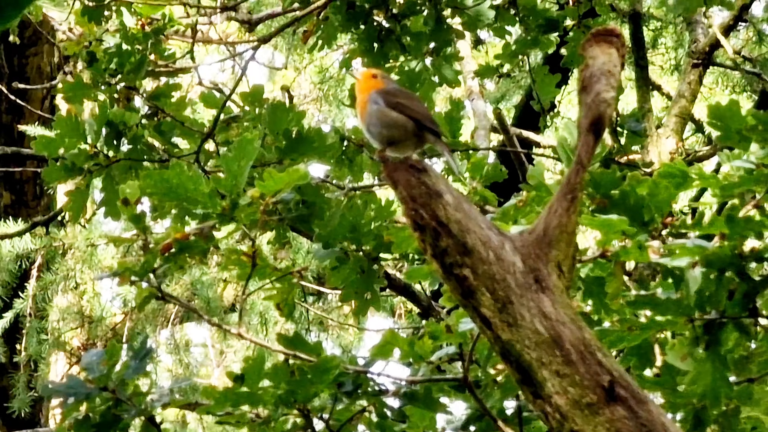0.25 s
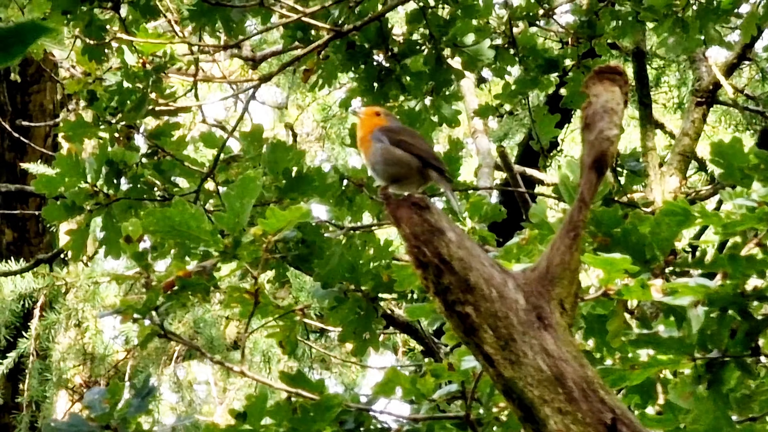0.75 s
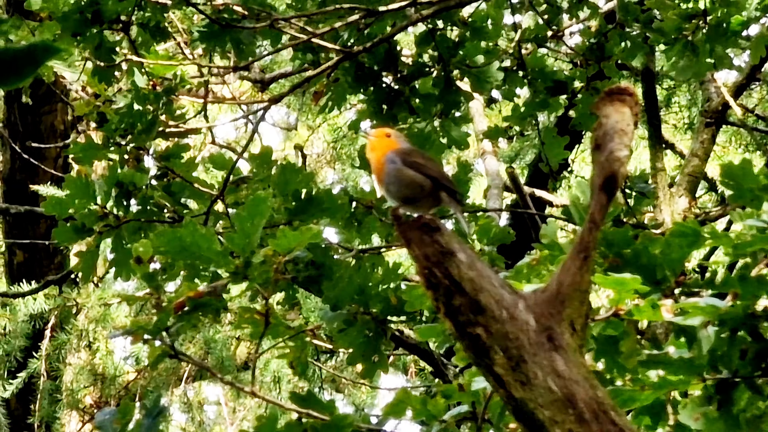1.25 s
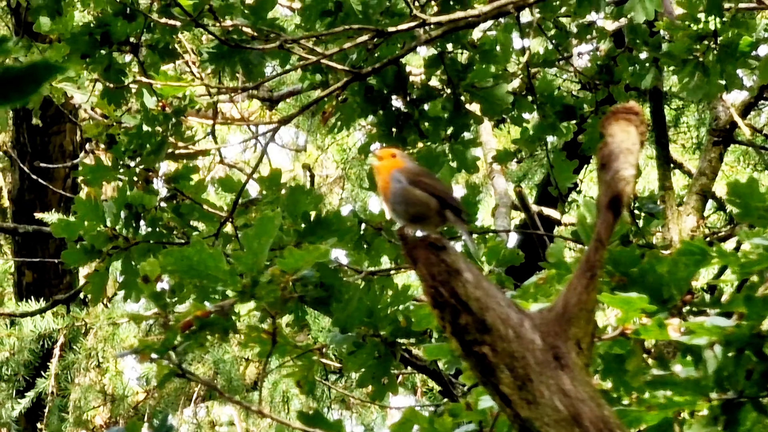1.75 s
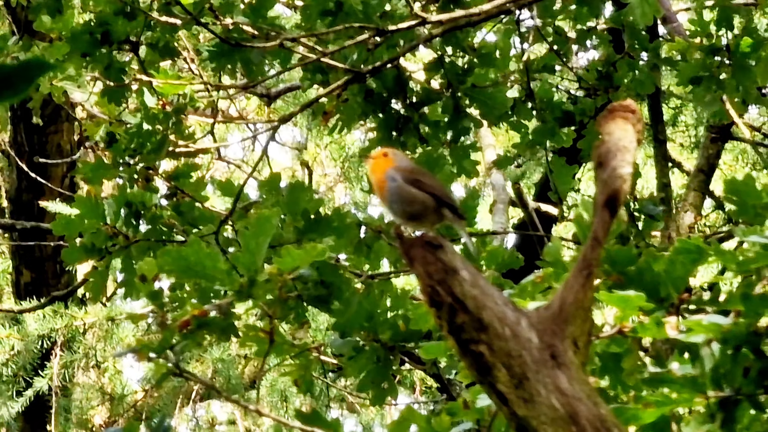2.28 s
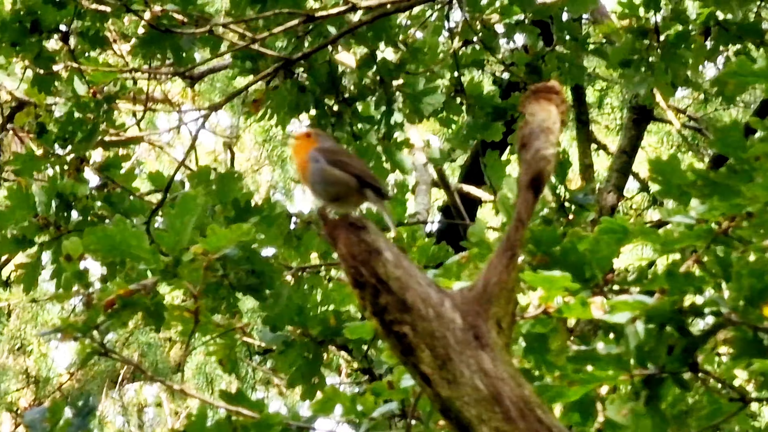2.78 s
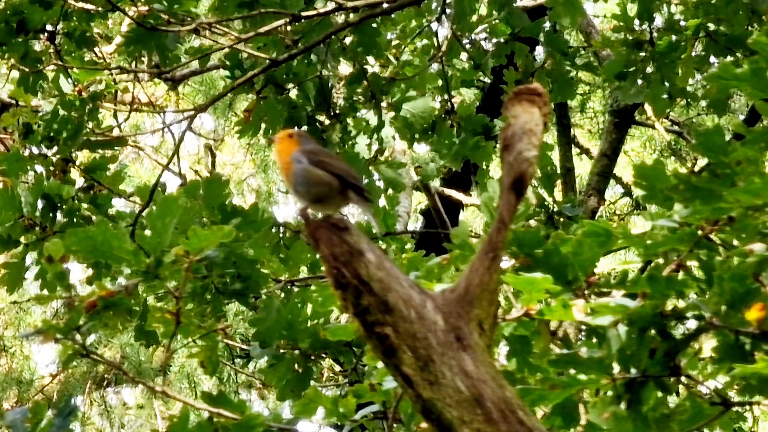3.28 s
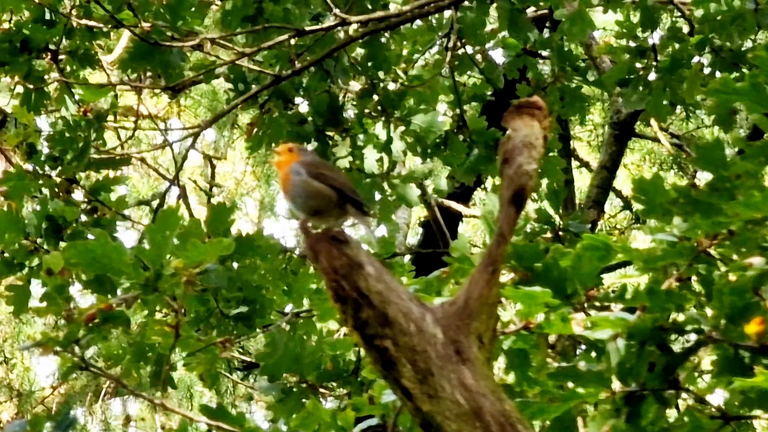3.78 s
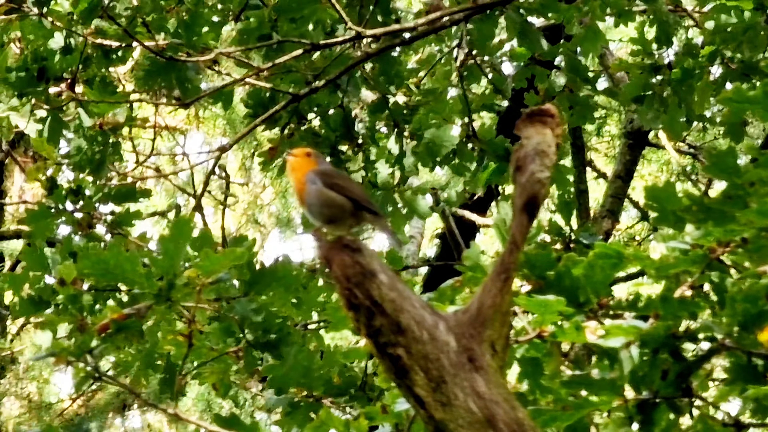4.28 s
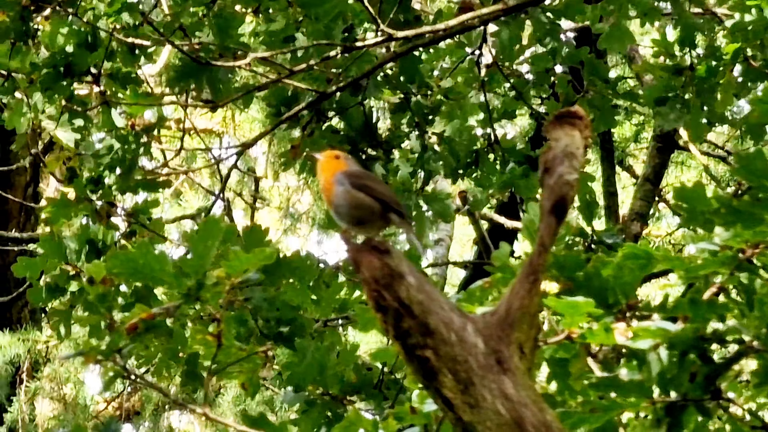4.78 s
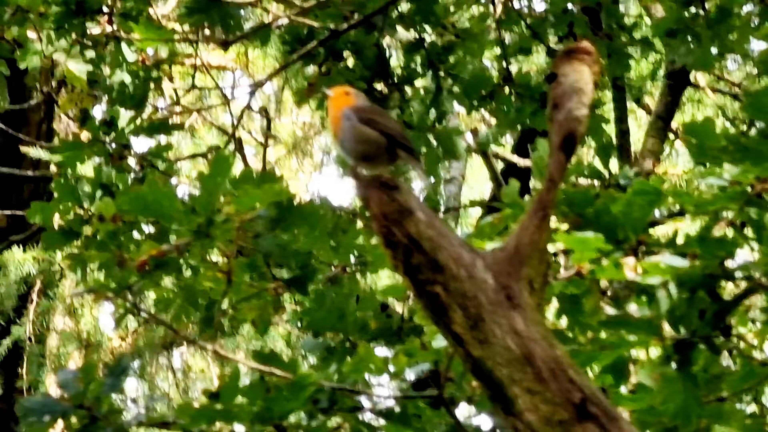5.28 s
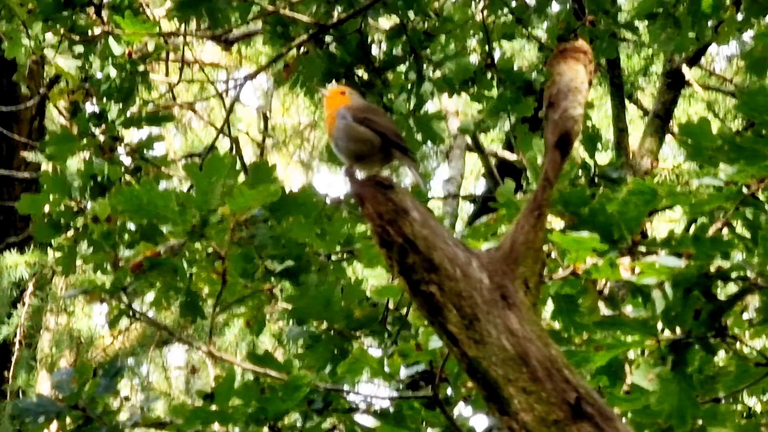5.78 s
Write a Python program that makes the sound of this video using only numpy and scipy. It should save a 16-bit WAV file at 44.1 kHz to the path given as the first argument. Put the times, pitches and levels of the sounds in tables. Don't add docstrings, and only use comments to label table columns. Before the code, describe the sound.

Bright, liquid bird warbles, shrill falls and a fast rattle echo softly among trees, with faint far birds and deep distant rumble beneath.

```python
import sys
import numpy as np
from scipy import signal
from scipy.fft import rfft, irfft, next_fast_len
from scipy.io import wavfile
from scipy.ndimage import uniform_filter1d

SR = 44100
rng = np.random.default_rng(int(sys.argv[2]) if len(sys.argv) > 2 else 0)


def output_pcm(signal):
    pcm = np.clip(np.atleast_2d(signal).T, -1, 1) * 32767
    wavfile.write(sys.argv[1], SR, np.round(pcm).astype(np.int16))


def magnitude_from_level(level_db):
    exponent = np.asarray(level_db, float) / 20
    return 10 ** exponent


N = 266364
EDGE_HZ = 15830


def evened(x):
    return x / np.sqrt(np.mean(x ** 2) + 1e-20)


def read(points, hz):
    f, value = np.transpose(points)
    return np.interp(np.log(hz + 1), np.log(f + 1), value)


def add(mix, s, sound):
    part = mix[..., round(s * SR):][..., :sound.shape[-1]]
    part += sound[..., :part.shape[-1]]


def wander(count, smooth_s):
    size = max(round(smooth_s * SR), 1)
    once = uniform_filter1d(rng.standard_normal(count), size)
    return evened(uniform_filter1d(once, size))


def unroll(rows, fade_s):
    s, *columns = np.transpose(rows)
    t = np.arange(s[0], s[-1], 1 / SR)
    to_end = np.minimum(t - s[0], s[-1] - t)
    fade = np.sin(np.pi / 2 * np.clip(to_end / fade_s, 0, 1))
    return s[0], fade, [np.interp(t, s, c) for c in columns]


def shaped(table, attack, release, start_db, end_db, hurry=1.01, dip_hz=0.1):
    u = np.linspace(0, 1, 80)
    swell_db = start_db * np.clip(1 - u / attack, 0, 1) + end_db * np.clip(1 - (1 - u) / release, 0, 1)
    glide = 1 - (1 - u) ** hurry
    dip = dip_hz * np.sin(np.pi * u)
    return [np.c_[s + length * u, first + (last - first) * glide - dip, db + swell_db]
            for s, length, first, last, db in table]


def sung(tables, voice):
    line = np.zeros(N)
    for rows in tables:
        add(line, *voice(rows))
    return line


# (time [s], factor on waver and flutter [1])
VOICE_STRAIN = [(0, 0.98), (1.7, 0.87), (2.0, 0.91), (2.24, 1.36), (2.27, 0.55), (2.4, 1.2), (2.89, .5),
                (2.93, 1.3), (2.989, 1), (3.03, 0.43), (3.581, 1.2), (3.8, 2), (4.031, 3.5), (4.06, 1.1),
                (4.17, 0.71), (4.211, 1.2), (4.3, 1.2), (4.5, 1.2), (4.62, 1.2), (4.71, 0.14), (6.04, .6)]
# (frequency [Hz], level under the note [dB])
OVERTONE_COLOUR = [(5000, -36), (7000, -34.5), (8500, -47.5), (9500, -39), (11000, -32), (13200, -38.5),
                   (14200, -28.5), (16000, -28.5)]
OVERTONE_TRIM = [2, -13.5, -19, -6]


def whistle(rows, waver_hz=20, flutter_db=1.4, blur=1, clear=.7):
    s, fade, (hz, db) = unroll(rows, fade_s=.0025)
    count = len(hz)
    strain = blur * np.interp(s + np.arange(count) / SR, *np.transpose(VOICE_STRAIN))
    hz = uniform_filter1d(hz, 90) + strain * waver_hz * wander(count, smooth_s=0.0018)
    turn = 2 * np.pi * np.cumsum(hz) / SR
    k = np.arange(2, 6)[:, None]
    overtone_level = magnitude_from_level(read(OVERTONE_COLOUR, k * hz) + np.c_[OVERTONE_TRIM])
    overtones = overtone_level * np.sin(k * turn) * (k * hz < EDGE_HZ)
    overtones = overtones * (clear + (1 - clear) * wander(count, smooth_s=.0008))
    level = magnitude_from_level(db + strain * flutter_db * wander(count, smooth_s=0.0023))
    return s, np.sqrt(2) * fade * level * (np.sin(turn) + overtones.sum(0))


def coupled(x, mix_db=-20, rasp_db=-40, rasp_hz=(11100, 12500), shrill_hz=5200):
    power = abs(signal.hilbert(x, next_fast_len(N))[:N]) ** 2
    slow = uniform_filter1d(power, 300) + 1e-9
    pull = magnitude_from_level(mix_db) * np.interp(np.arange(N) / SR, *np.transpose(VOICE_STRAIN)) ** 2
    rasp_band = signal.butter(2, rasp_hz, "band", fs=SR, output="sos")
    rasp = signal.sosfilt(rasp_band, rng.standard_normal(N))
    shrill = signal.sosfilt(signal.butter(4, shrill_hz, "high", fs=SR, output="sos"), x)
    blow = np.sqrt(abs(uniform_filter1d(shrill ** 2, 600)))
    return x * (1 + pull * (np.tanh(power / slow - 1))) + magnitude_from_level(rasp_db) * blow * evened(rasp)


# (time [s], pitch [Hz], level [dB])
STAIRCASE_FALLS = [
    [(1.826, 8500, -36), (1.837, 6690, -30), (1.852, 7170, -26.5), (1.86, 6800, -27.5), (1.879, 6880, -24),
     (1.897, 5185, -19.5), (1.914, 4612, -22), (1.932, 4753, -16.5), (1.943, 5130, -27.5)],
    [(2.125, 7750, -36.5), (2.14, 7500, -35), (2.158, 7440, -23), (2.174, 6366, -20.5), (2.189, 5490, -26),
     (2.207, 5990, -23), (2.235, 5610, -16.5)],
    [(2.232, 5710, -16), (2.245, 4344, -32), (2.256, 4633, -26), (2.271, 4727, -14.5), (2.284, 4610, -23.5),
     (2.299, 2460, -39)],
    [(2.393, 5510, -27.5), (2.401, 4060, -23.5), (2.41, 4235, -27.5), (2.419, 3120, -33.5),
     (2.44, 2780, -42.5), (2.466, 2800, -44.5)],
    [(2.876, 3976, -29.5), (2.888, 4128, -24), (2.922, 4480, -24.5), (2.937, 5234, -20.5),
     (2.95, 5430, -25), (2.966, 5314, -21.5), (2.976, 5080, -22.5), (2.989, 4044, -25),
     (3.002, 3280, -29.5)],
]
# (time [s], pitch [Hz], level [dB])
BENT_NOTES = [
    [(1.455, 3530, -56.5), (1.472, 3560, -45), (1.488, 3600, -51), (1.512, 3584, -45), (1.545, 3557, -50),
     (1.563, 3520, -47.5), (1.576, 3440, -53), (1.6, 3450, -55)],
    [(1.437, 4090, -54), (1.46, 3800, -54), (1.5, 3780, -53), (1.512, 3860, -47), (1.525, 3830, -48.5),
     (1.54, 3870, -44.5), (1.556, 3750, -52), (1.582, 3735, -48.5), (1.592, 3700, -56)],
    [(1.089, 3480, -37.5), (1.095, 3880, -28.5), (1.11, 4220, -29.5), (1.122, 3763, -36),
     (1.151, 3700, -33.5), (1.162, 3810, -49)],
    [(1.757, 6080, -44), (1.764, 7460, -51), (1.769, 6390, -45.5), (1.775, 8140, -42.5), (1.783, 5440, -53),
     (1.793, 6800, -37), (1.799, 5640, -45), (1.819, 6380, -40), (1.846, 4550, -35.5)],
    [(4.062, 3894, -30.5), (4.07, 3560, -27), (4.075, 3984, -25.5), (4.079, 3610, -30),
     (4.084, 3970, -30.5), (4.091, 3760, -27.5), (4.107, 3875, -20.5), (4.126, 3560, -24),
     (4.134, 3550, -29.5)],
    [(.988, 4110, -34.5), (.994, 3760, -34.5), (1.0, 4030, -31.5), (1.005, 3460, -31), (1.026, 3277, -30.5),
     (1.045, 3330, -35.5)],
    [(1.284, 3390, -36), (1.3, 3370, -38), (1.315, 3417, -32.5), (1.333, 3880, -35.5)],
    [(3.635, 7870, -40), (3.648, 7100, -32.5), (3.665, 7230, -38), (3.684, 7360, -40)],
]
# (time [s], pitch [Hz], level [dB])
SINKING_NOTES = [
    [(2.999, 3307, -24.5), (3.012, 2924, -29), (3.026, 3027, -27.5), (3.04, 2722, -32.5),
     (3.07, 2634, -40.5), (3.087, 2525, -47)],
    [(4.705, 3250, -29), (4.712, 2971, -26), (4.744, 2944, -37), (4.757, 2833, -35), (4.777, 2850, -38.5),
     (4.789, 2960, -46)],
    [(1.941, 5120, -22), (1.949, 3950, -22), (1.958, 2634, -41.5), (1.971, 2960, -44.5)],
]


def drawn_notes():
    return STAIRCASE_FALLS + BENT_NOTES + SINKING_NOTES


# (start [s], length [s], first pitch [Hz], last pitch [Hz], level [dB])
WARBLED_NOTES = [(.718, 0.012, 3610, 3480, -54.5), (.738, 0.035, 3770, 4160, -45.5),
                 (.777, 0.018, 3850, 4240, -37.5), (.874, 0.014, 3710, 3850, -42.5),
                 (.935, 0.04, 7670, 7300, -64.5), (.977, 0.013, 3750, 5360, -36.5),
                 (1.174, 0.023, 3780, 3703, -30.5), (1.249, 0.01, 3700, 3850, -34.5),
                 (1.257, .009, 3900, 5080, -36), (1.263, 0.02, 3583, 3513, -28),
                 (1.376, 0.021, 3674, 3716, -33), (1.426, 0.0092, 3450, 3620, -42),
                 (1.745, 0.01, 4960, 5900, -50.5), (2.118, 0.019, 8950, 7720, -46),
                 (2.116, 0.0049, 12500, 9470, -53.5), (1.79, 0.04, 7960, 8640, -42),
                 (2.852, 0.028, 4280, 3660, -51.5), (3.29, 0.054, 4030, 4070, -59),
                 (3.36, 0.058, 3156, 3170, -59.5), (3.562, 0.036, 3770, 4300, -63),
                 (3.56, 0.019, 3550, 3530, -64), (3.6, .08, 4280, 4230, -69.5),
                 (3.732, 0.031, 4070, 4250, -63.5), (4.159, .017, 3816, 3430, -22.5),
                 (4.646, 0.017, 3046, 3105, -33.5), (4.583, 0.012, 3943, 3866, -24)]


def warbled_notes():
    return shaped(WARBLED_NOTES, attack=0.35, release=0.24, start_db=-3.5, end_db=-1.5)


# (start [s], length [s], first pitch [Hz], last pitch [Hz], level [dB])
SETTLING_NOTES = [(2.6, .012, 7600, 6100, -58), (.885, 0.012, 3800, 3350, -37),
                  (.895, .013, 3450, 3120, -43), (2.684, 0.057, 6000, 7650, -57.5),
                  (2.6, .08, 3345, 3315, -61), (2.665, .11, 3800, 4280, -64), (2.71, 0.03, 3270, 3240, -60),
                  (4.604, .02, 7100, 6400, -59), (5.4, 0.0234, 7000, 6300, -63),
                  (4.544, 0.0081, 4730, 3760, -23.5), (4.604, 0.014, 3575, 3200, -28.5),
                  (4.616, .009, 4200, 3156, -25), (4.635, 0.017, 4500, 3120, -31),
                  (4.459, 0.011, 4000, 3780, -28)]


def settling_notes():
    return shaped(SETTLING_NOTES, attack=.2, release=0.27, start_db=2, end_db=-7.5, hurry=3.8)


# (start [s], length [s], first pitch [Hz], last pitch [Hz], level [dB])
TRILL_NOTES = [(3.551, 0.031, 6520, 7640, -42), (3.58, 0.024, 7400, 6760, -38),
               (3.592, .012, 6850, 6800, -35.5), (3.605, 0.015, 6820, 6800, -31),
               (3.619, 0.019, 6795, 6794, -28.5), (3.6, .037, 7430, 7920, -38),
               (3.655, 0.027, 7920, 7660, -46), (3.675, .008, 7040, 6350, -41.5),
               (3.701, .016, 7050, 7080, -38.5), (3.718, 0.025, 7130, 7130, -35),
               (3.726, 0.1, 7510, 7770, -37.5), (3.755, 0.021, 7120, 7150, -32.5),
               (3.78, 0.0092, 7200, 7250, -26), (3.789, .006, 7150, 7150, -30),
               (3.804, 0.009, 7250, 7020, -31.5), (3.812, .02, 7750, 6940, -42.5),
               (3.835, 0.046, 7260, 7520, -41.5), (3.885, 0.027, 7500, 7520, -51.5),
               (3.93, 0.037, 7470, 7550, -47.5), (3.975, .04, 7500, 7640, -60.5)]


def high_trill():
    return shaped(TRILL_NOTES, attack=.5, release=0.37, start_db=-9.0, end_db=-6.0)


# (start [s], length [s], first pitch [Hz], last pitch [Hz], level [dB])
RATTLE_CHIPS = [(.763, 0.0087, 4080, 4300, -38.5), (4.194, 0.015, 4800, 4470, -25),
                (4.216, 0.014, 4380, 4410, -21), (4.229, 0.0036, 4510, 4910, -21),
                (4.234, .009, 4690, 5000, -36.5), (4.254, 0.0097, 4970, 4800, -25.5),
                (4.263, 0.0072, 4830, 4880, -23), (4.275, 0.015, 4370, 4710, -23),
                (4.287, 0.0053, 4760, 5190, -25), (4.297, 0.0064, 4930, 4700, -31.5),
                (4.309, 0.0047, 4160, 4500, -30.5), (4.314, 0.017, 4490, 4605, -25.5),
                (4.34, 0.016, 4010, 4400, -25.5), (4.371, 0.019, 4460, 4500, -33),
                (4.387, 0.0086, 4300, 4300, -33.5), (4.399, 0.01, 4200, 5070, -26.5),
                (4.44, 0.01, 4240, 4270, -30.5), (4.653, .014, 3835, 3790, -29),
                (4.668, 0.012, 3410, 3330, -27), (4.682, 0.011, 3280, 3450, -29),
                (4.69, 0.012, 3170, 3230, -27), (4.696, 0.0098, 3310, 3390, -30.5)]


def rattle():
    return shaped(RATTLE_CHIPS, attack=.25, release=.25, start_db=-5, end_db=-5, dip_hz=260)


# (time [s], level [dB])
SNAP_FLICKS = [(1.259, -48.5), (4.176, -52), (4.197, -49.5), (4.217, -46), (4.238, -45), (4.276, -41),
               (4.291, -35.5), (4.3, -54.5), (4.32, -43.5), (4.34, -49), (4.406, -47), (4.545, -48),
               (4.658, -50)]


def flicks():
    return sung(SNAP_FLICKS, flick)


def flick(row, low_hz=4400, high_hz=7400, fall_db=-19, length_s=0.005):
    s, db = row
    bottom = (s - length_s / 2, low_hz, db)
    top = (s + length_s / 2, high_hz, db + fall_db)
    return whistle([bottom, top])


# (start [s], length [s], first pitch [Hz], last pitch [Hz], 2nd partial level [dB])
MURMUR_NOTES = [
    (2.5, 0.09, 1190, 1118, -60),
    (2.6, 0.093, 1118, 1098, -60.5),
    (2.7, 0.084, 1080, 1070, -56.5),
    (3.149, 0.054, 1089, 1037, -49),
    (3.236, .09, 1067, 988, -56),
    (3.33, 0.09, 1034, 1034, -55),
]


def murmurs():
    return sung(shaped(MURMUR_NOTES, attack=0.17, release=0.16, start_db=-2.5, end_db=-8), murmur)


MURMUR_PARTIALS = [1.5, -16.5, -16.5]


def murmur(rows):
    s, fade, (hz, db) = unroll(rows, fade_s=0.0025)
    turn = 2 * np.pi * np.cumsum(hz + 6 * wander(len(hz), smooth_s=0.0029)) / SR
    level = magnitude_from_level(db + 2.0 * wander(len(hz), smooth_s=0.0076))
    partials = sum(magnitude_from_level(p) * np.sin((k + 2) * turn) for k, p in enumerate(MURMUR_PARTIALS))
    return s, np.sqrt(2) * fade * level * partials


def robin():
    notes = drawn_notes() + warbled_notes() + settling_notes() + high_trill() + rattle()
    return coupled(sung(notes, whistle) + flicks()) + murmurs()


# (frequency [Hz], left-right level [dB])
PORT_LEVEL = [(2700, -1.5), (3300, -8), (4100, -5.5), (4700, -7.5), (6000, -5), (7000, -15), (7700, 2)]
# (frequency [Hz], left lead [rad])
PORT_PHASE = [(2700, 0), (3400, 0.54), (3750, 0), (4300, 1.64), (5000, -0.5), (5800, 1.5), (6800, 1.5),
              (7500, 4.5), (8200, 3.5), (11500, 8)]
# (delay [s], left level [dB], right level [dB])
NEAR_ECHOES = [
    (.0016, -28, -43.5),
    (.0045, -31, -6.5),
    (.0095, -9, -19.5),
    (.017, -10.5, -19.5),
    (.031, -22.5, -13.5),
]


def heard(x, direct_db=-1):
    size = next_fast_len(N + 4096)
    hz = np.fft.rfftfreq(size, 1 / SR)
    spin = -2j * np.pi * hz
    left = magnitude_from_level(direct_db + read(PORT_LEVEL, hz) / 2) * np.exp(1j * read(PORT_PHASE, hz))
    right = magnitude_from_level(direct_db - read(PORT_LEVEL, hz) / 2) + 0j
    for k, (s, echo_left_db, echo_right_db) in enumerate(NEAR_ECHOES):
        ear_gap_s = 0.000404 * (-1) ** k
        left = left + magnitude_from_level(echo_left_db) * np.exp(spin * (s + ear_gap_s))
        right = right + magnitude_from_level(echo_right_db) * np.exp(spin * s)
    return irfft(rfft(x, size) * np.array([left, right]), size)[:, :N]


# (frequency [Hz], time to fall 60 dB [s])
WOOD_DECAY = [(2000, 1.6), (3000, 0.7), (4000, 0.74), (6000, 0.7), (8000, 0.78), (14000, 1.07)]


def shimmer(x, start_s, near_db=6.0, near_s=0.074, sway_hz=18):
    taps = np.zeros((6, 54000))
    at = np.arange(0, 54000, 10) + rng.integers(0, 10, (6, 5400))
    np.put_along_axis(taps, at, rng.choice([-1., 1.], at.shape), 1)
    hz, t, z = signal.stft(taps, SR, nperseg=128)
    decay = magnitude_from_level(-60 * t / read(WOOD_DECAY, hz)[:, None])
    tail = signal.istft(z * decay, SR, nperseg=128)[1]
    t = np.arange(tail.shape[1]) / SR
    tail = tail * np.clip(t / start_s, 0, 1) * magnitude_from_level(near_db * np.exp(-(t / near_s) ** 2))
    turn = 2 * np.pi * (sway_hz * np.arange(N) / SR + np.arange(3)[:, None] / 3)
    feeds = np.tile(x * np.cos(turn) * np.sqrt(2 / 3), (2, 1))
    wet = signal.fftconvolve(feeds, tail / np.linalg.norm(tail[0]), axes=1)[:, :N]
    return wet.reshape(2, 3, N).sum(1)


# (start [s], length [s], first pitch [Hz], last pitch [Hz], level [dB])
FAR_CALLS = [(.1, 0.12, 3630, 3530, -72.5), (.32, 0.12, 3150, 3080, -72.5), (.45, 0.15, 2300, 2200, -71.5),
             (.63, 0.25, 7620, 7120, -76), (2.74, 0.024, 6000, 5600, -63.5),
             (4.965, 0.022, 4100, 4000, -70), (4.97, 0.028, 2400, 2370, -76),
             (3.78, 0.021, 5300, 4670, -71), (3.96, 0.052, 4620, 4840, -80),
             (5.185, 0.026, 4230, 3940, -64.5), (5.185, .02, 4750, 4650, -70),
             (5.362, 0.024, 4750, 4680, -59.5), (5.382, 0.032, 4350, 4104, -57.5),
             (5.43, 0.078, 4250, 4300, -71), (5.57, .1, 3840, 3800, -69.5), (5.8, 0.26, 8000, 8200, -78.5)]


def far_birds():
    calls = shaped(FAR_CALLS, attack=.15, release=0.22, start_db=7.0, end_db=-4.0)
    return magnitude_from_level(8.0) * sung(calls, far_call)


def far_call(rows):
    return whistle(rows, waver_hz=140, flutter_db=2.5, blur=1)


# (frequency [Hz], level [dB])
MICROPHONE_TONE = [(7900, 2), (8500, -1.5), (9200, -2.5), (10500, -19), (12000, -1.5), (14000, 0.5)]


def through_microphone(x):
    hz = np.fft.rfftfreq(N, 1 / SR)
    return irfft(rfft(x) * magnitude_from_level(read(MICROPHONE_TONE, hz)), N)


# (time [s], peak level [dB], left-right level [dB], thump level [dB])
FINGER_TICKS = [(0.0094, -33, 13, -3), (0.167, -30.5, 14, -3), (0.2627, -19.5, 22.5, 5),
                (0.2735, -46.5, 1, 25.5), (0.4688, -39, 12, -18), (0.5023, -34, -3.5, -12),
                (1.5335, -38, 7, 1), (1.548, -38, 9, -8), (2.3, -50, 0, 10), (3.35, -46, 0, -15),
                (3.385, -48, 0, -15), (4.3732, -30.5, 6, -11), (5.2114, -44.5, 2, -4),
                (5.3384, -40, -6, -15), (5.5034, -42, -10.5, 0)]
# (frequency [Hz], width [Hz], level [dB])
SHELL_MODES = [(720, 2300, 11), (3560, 2770, 11.5), (7300, 930, -8.5), (12400, 3000, -4)]


def ticks(rise_s=0.00021):
    t, out = np.arange(300) / SR, np.zeros((2, N))
    onset = 1 - np.exp(-t / rise_s)
    thump, *modes = (magnitude_from_level(db) * onset * np.exp(-np.pi * width * t) * np.sin(2 * np.pi * hz * t)
                     for hz, width, db in SHELL_MODES)
    for s, peak_db, pan_db, thump_db in FINGER_TICKS:
        knock = magnitude_from_level(peak_db) * (sum(modes) + magnitude_from_level(thump_db) * thump)
        add(out, s + rise_s + 0.0013, knock * magnitude_from_level(np.array([[pan_db / 2], [-pan_db / 2]])))
    return out


# (frequency [Hz], level [dB per Hz])
AIR_SPECTRUM = [(20, -17.5), (45, -2.5), (86, 3.5), (125, -1), (158, -7), (200, -5.5), (260, -10),
                (740, -20.5), (1450, -26.5), (2400, -33.5), (3800, -32.5), (8200, -37.5), (9500, -63.5),
                (10800, -54), (12000, -54), (16000, -57)]
# (frequency [Hz], left-right correlation [1])
AIR_LIKENESS = [(60, .91), (150, .88), (380, .83), (700, .36), (1300, -.17), (4400, -.1), (15000, .1)]
# (frequency [Hz], left-right level [dB])
AIR_BALANCE = [(60, 0.5), (180, -0.5), (550, -0.5), (1650, 3), (4970, -3.5), (15000, 9.5)]
# (time [s], level [dB])
TRAFFIC_THROB = [
    (0.0, -30),
    (1.0, -39.5),
    (2.0, -52.5),
    (3.3, -31),
    (4.2, -43.5),
    (6.04, -43.5),
]


def air(level_db=-40, patchy_db=1.58, throb_share=0.24, throb_top_hz=140):
    frames, hz = N // 512 + 5, np.fft.rfftfreq(2048, 1 / SR)
    a, b, c, d, patches = rng.standard_normal((frames, 1025, 5)).T
    patches = evened(uniform_filter1d(uniform_filter1d(patches, 20, 0), 8, 1))
    throb_db = np.interp(np.arange(frames) * 512 / SR, *np.transpose(TRAFFIC_THROB))
    throb_db = throb_share * (throb_db - throb_db.mean()) / (1 + (hz[:, None] / throb_top_hz) ** 2)
    same = np.clip(read(AIR_LIKENESS, hz), -1, 1)[:, None]
    left = a + 1j * b
    right = same * left + np.sqrt(1 - same ** 2) * (c + 1j * d)
    z = np.array([left, right])
    z *= magnitude_from_level(read(AIR_SPECTRUM, hz)[:, None] + patchy_db * patches + throb_db)
    z *= magnitude_from_level(np.multiply.outer([.5, -.5], read(AIR_BALANCE, hz)))[:, :, None]
    return magnitude_from_level(level_db) * evened(signal.istft(z, nperseg=2048, noverlap=1536)[1][:, :N])


def scene():
    song = robin()
    lean = magnitude_from_level(np.array([[-1.5], [1.5]]))
    scattered = lean * shimmer(magnitude_from_level(-8.0) * song + far_birds(), start_s=0.0088)
    return through_microphone(heard(song) + scattered) + air() + ticks()


def masked(x, from_hz=8300, singer_hz=5900, fickle_db=1.0, under_db=-38, ceiling_db=-75,
           deep_db=-53, safe_hz=1500, spared_hz=9600):
    hz, _, z = signal.stft(x, SR, nperseg=2048, noverlap=1024)
    bands = (abs(z[:, :1024]) ** 2).reshape(2, 64, 16, -1).sum((0, 2))
    centre = hz[8:1024:16, None]
    loudest_high = (bands * (centre > singer_hz)).max(0)
    limit = np.minimum(magnitude_from_level(2 * under_db) * loudest_high, magnitude_from_level(2 * ceiling_db))
    fickle = magnitude_from_level(2 * fickle_db * rng.standard_normal(bands.shape))
    keep_treble = (bands > limit * fickle) | (centre < from_hz)
    above_deep = bands > magnitude_from_level(2 * deep_db) * bands.max(0) * fickle
    keep = keep_treble & (above_deep | (centre < safe_hz) | (centre > spared_hz))
    keep = np.vstack([np.repeat(keep, 16, 0), keep[-1:]])
    return signal.istft(z * keep, SR, nperseg=2048, noverlap=1024)[1][:, :N]


def top_cut(x):
    return signal.sosfilt(signal.butter(12, 16600, fs=SR, output="sos"), x)


def record(dry):
    lowpass = signal.firwin(511, EDGE_HZ, window=("kaiser", 8), fs=SR)
    limited = signal.oaconvolve(dry, lowpass[None], "same")
    return top_cut(masked(limited))


dry = scene()
out = record(dry)
output_pcm(out)
```